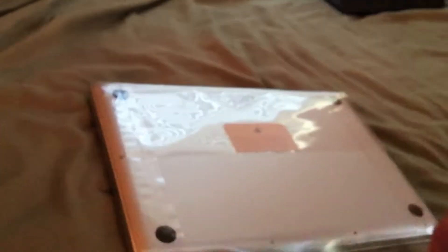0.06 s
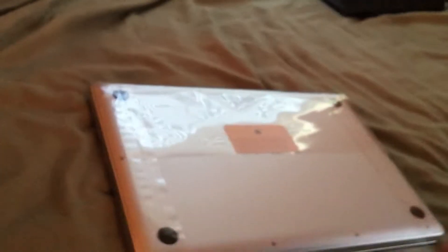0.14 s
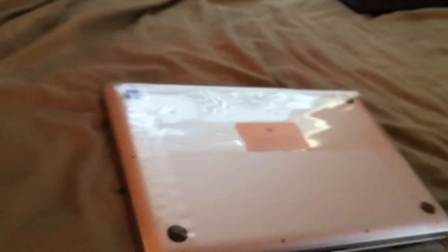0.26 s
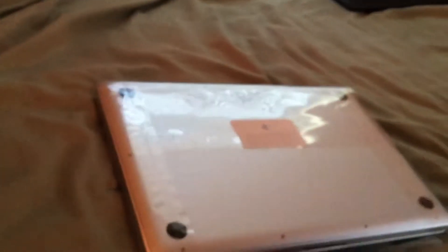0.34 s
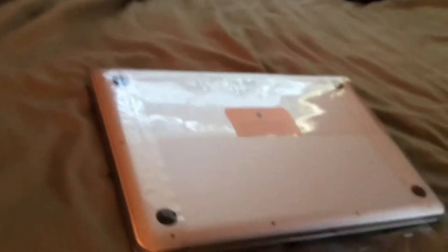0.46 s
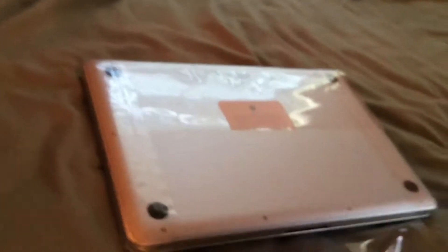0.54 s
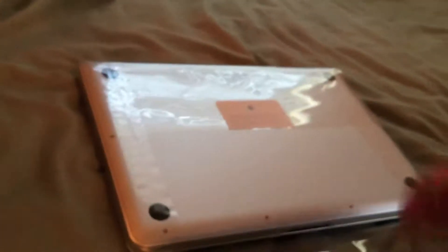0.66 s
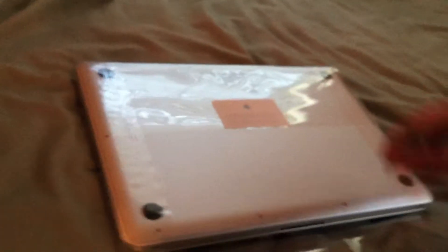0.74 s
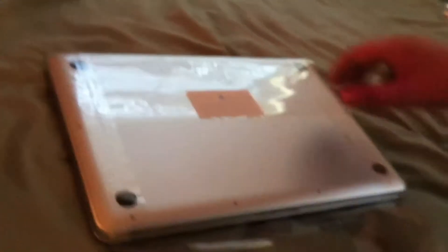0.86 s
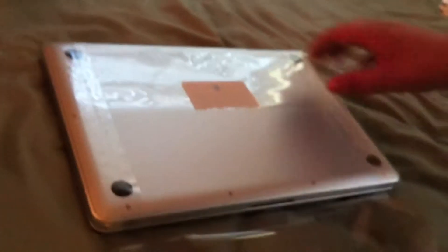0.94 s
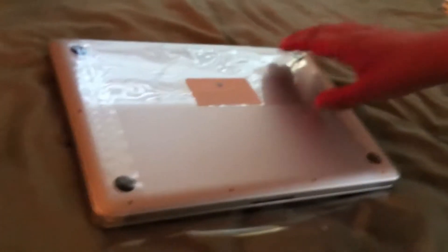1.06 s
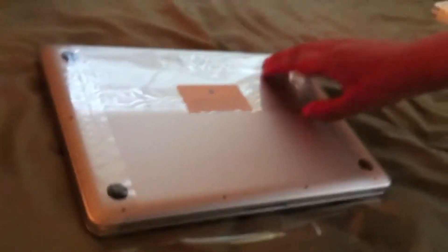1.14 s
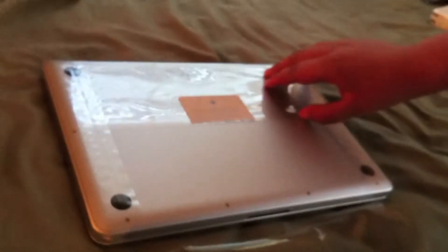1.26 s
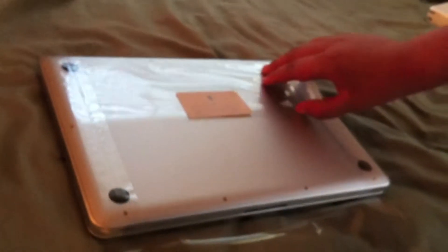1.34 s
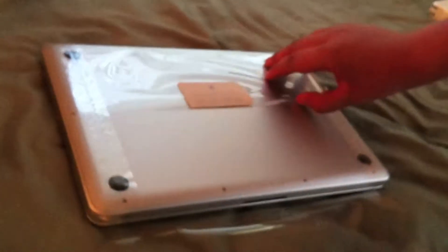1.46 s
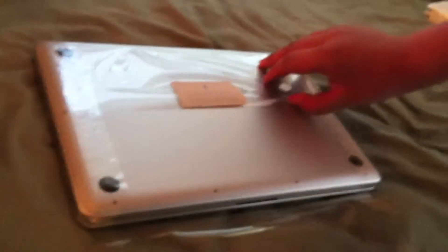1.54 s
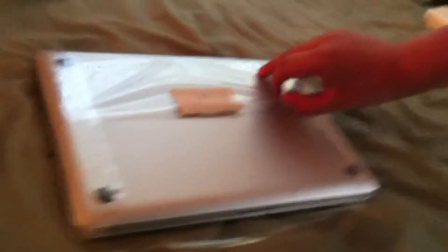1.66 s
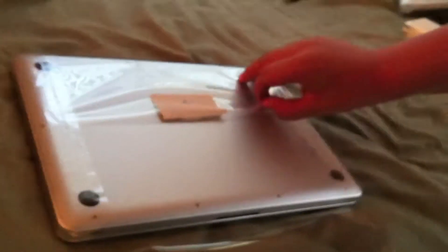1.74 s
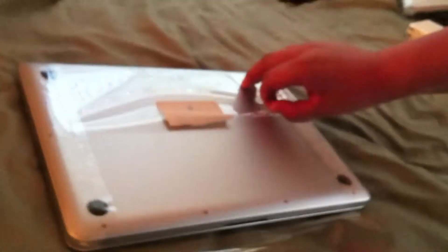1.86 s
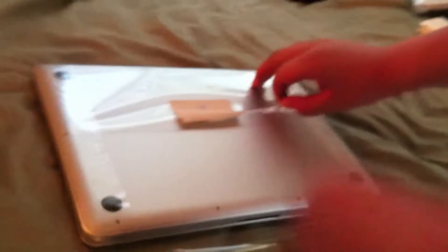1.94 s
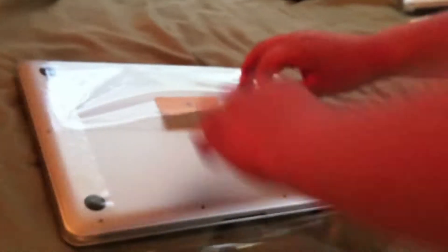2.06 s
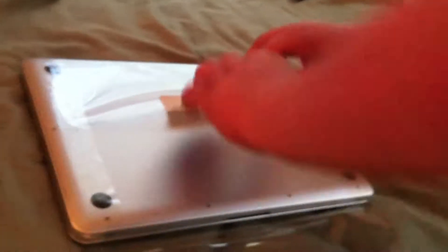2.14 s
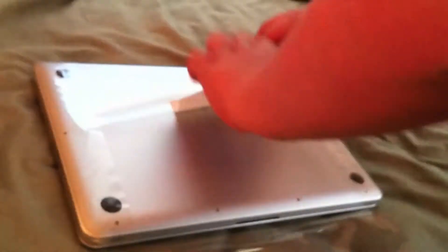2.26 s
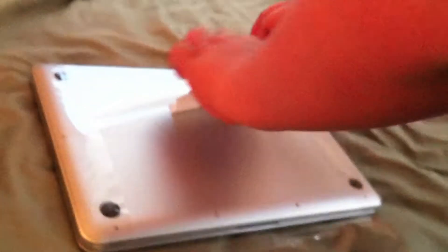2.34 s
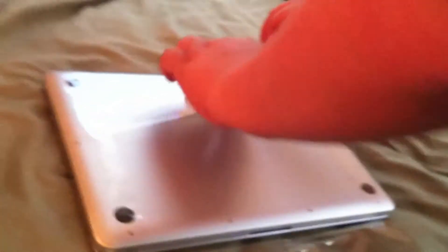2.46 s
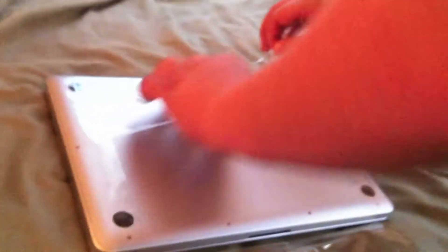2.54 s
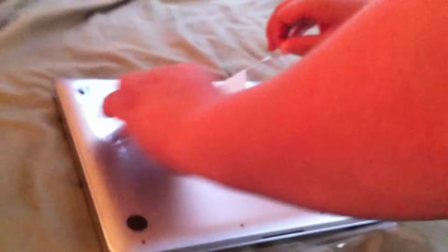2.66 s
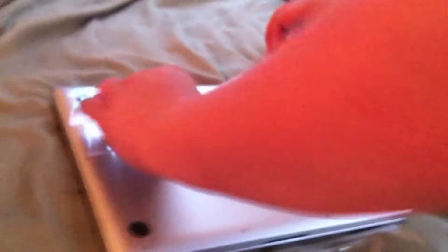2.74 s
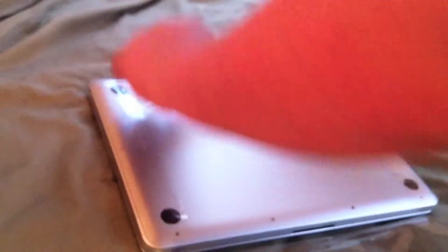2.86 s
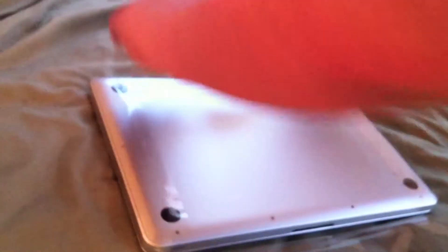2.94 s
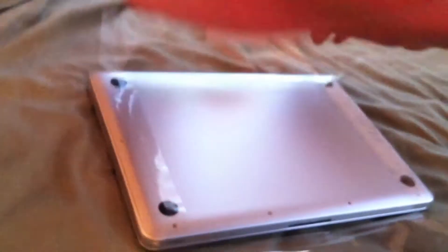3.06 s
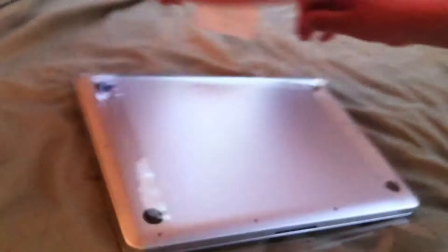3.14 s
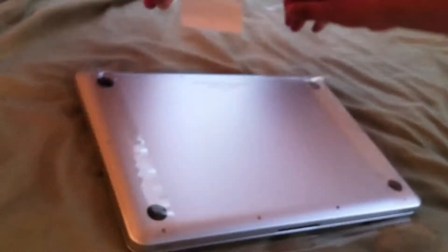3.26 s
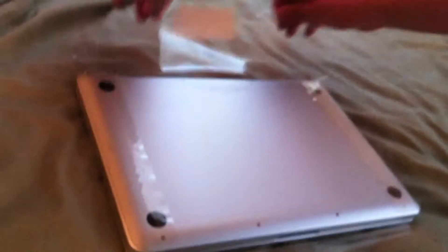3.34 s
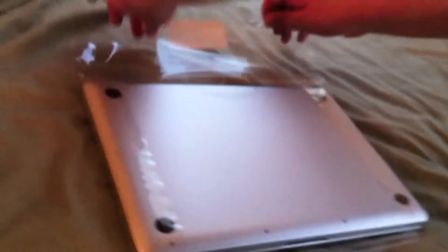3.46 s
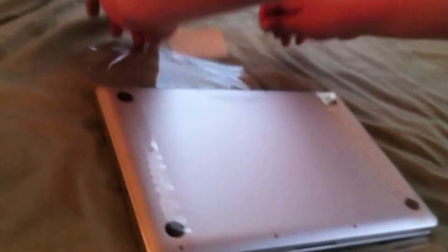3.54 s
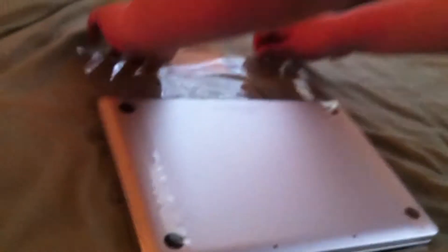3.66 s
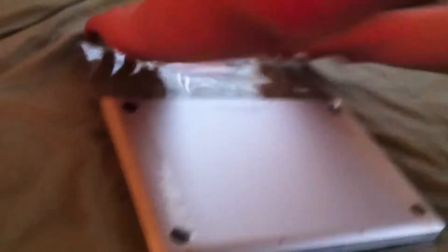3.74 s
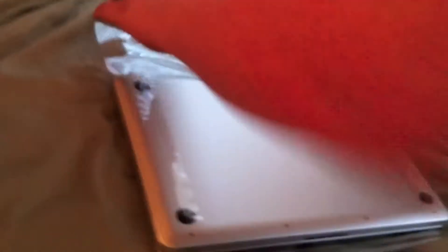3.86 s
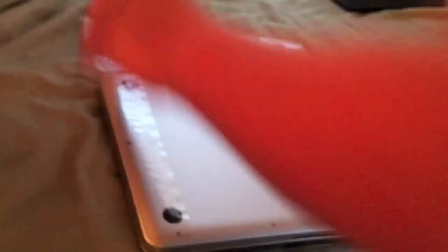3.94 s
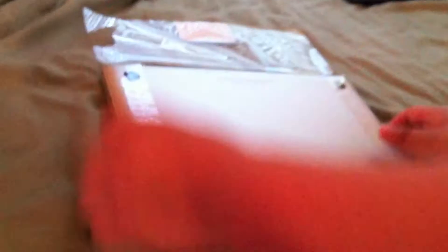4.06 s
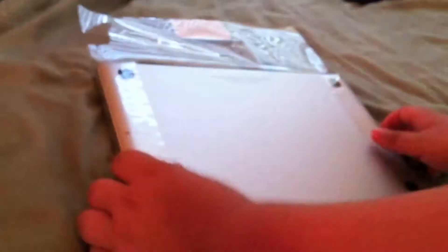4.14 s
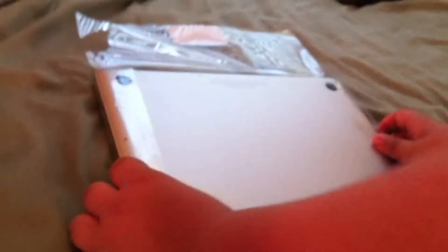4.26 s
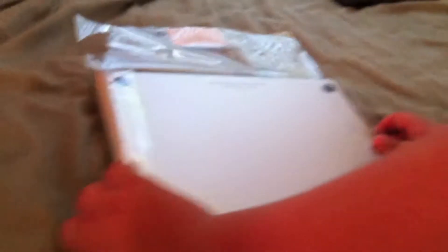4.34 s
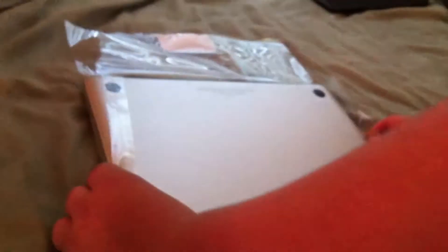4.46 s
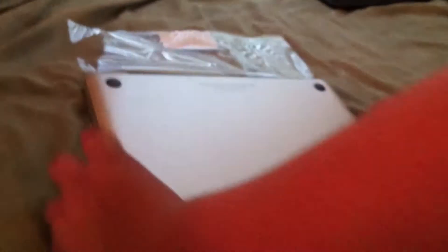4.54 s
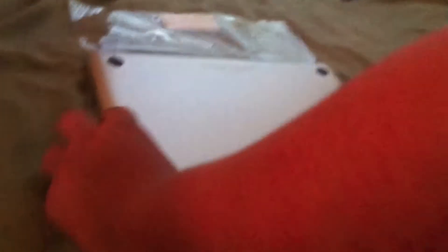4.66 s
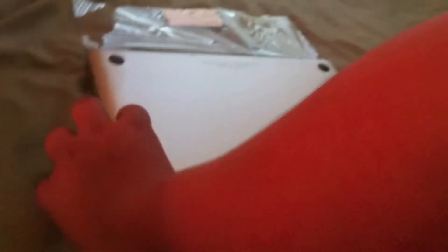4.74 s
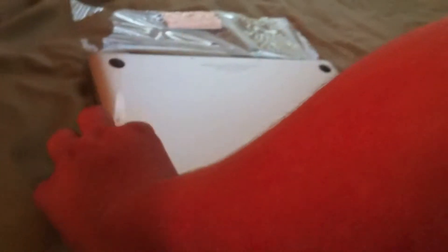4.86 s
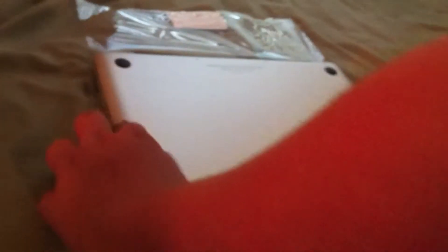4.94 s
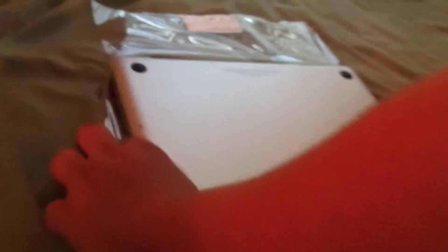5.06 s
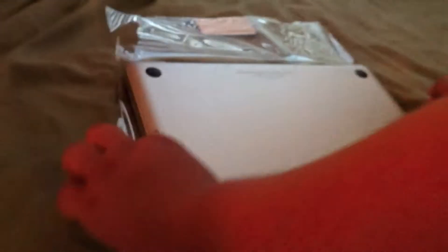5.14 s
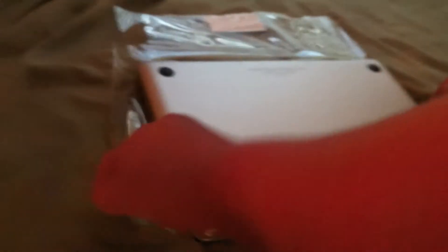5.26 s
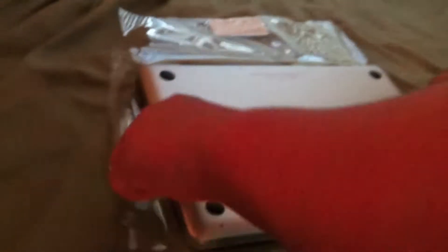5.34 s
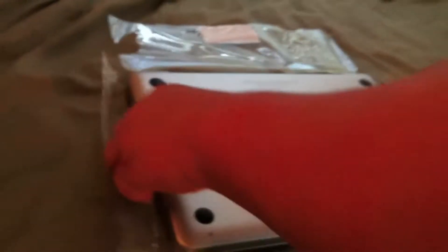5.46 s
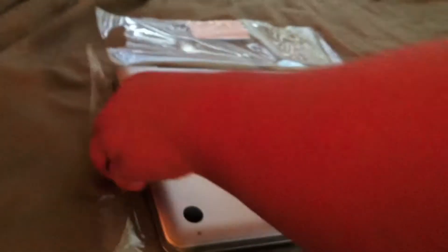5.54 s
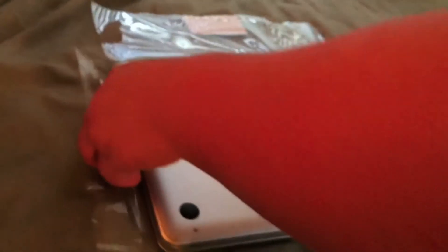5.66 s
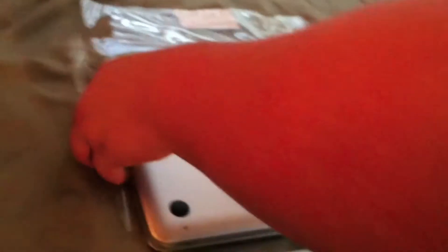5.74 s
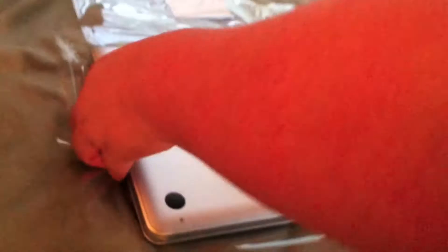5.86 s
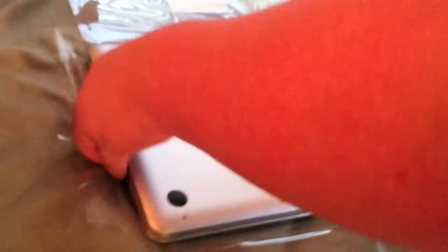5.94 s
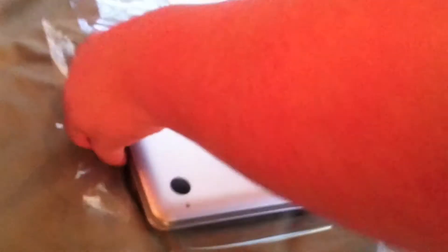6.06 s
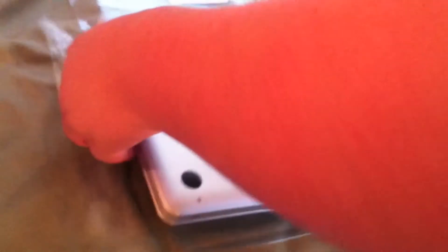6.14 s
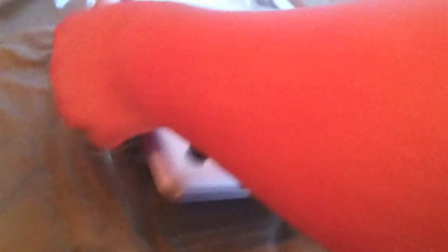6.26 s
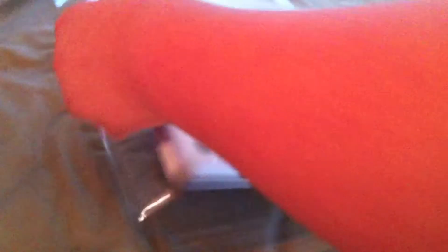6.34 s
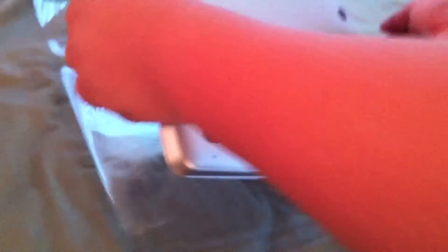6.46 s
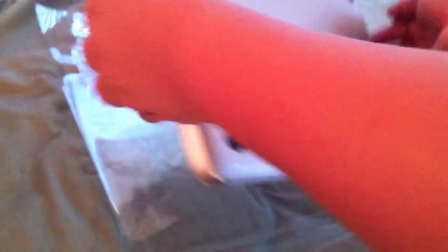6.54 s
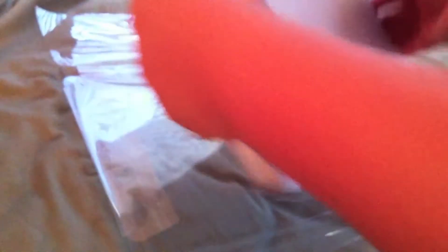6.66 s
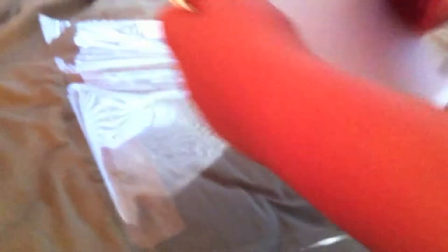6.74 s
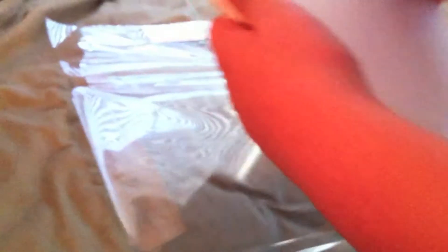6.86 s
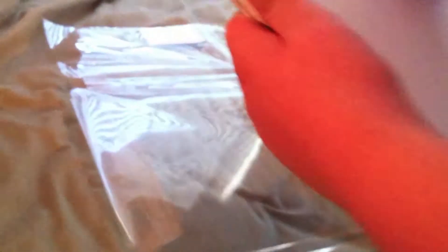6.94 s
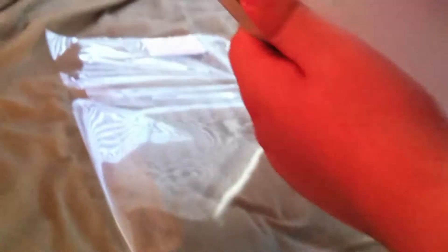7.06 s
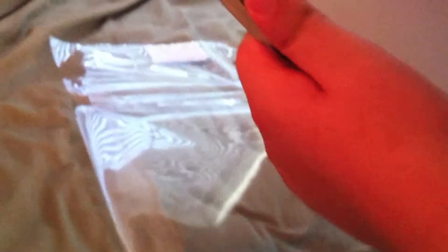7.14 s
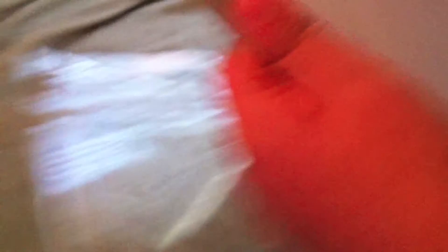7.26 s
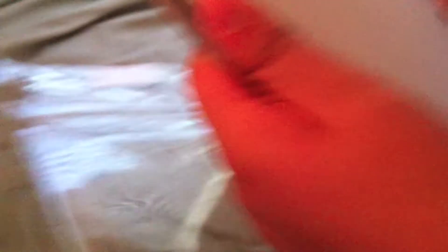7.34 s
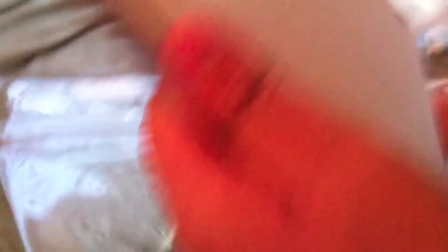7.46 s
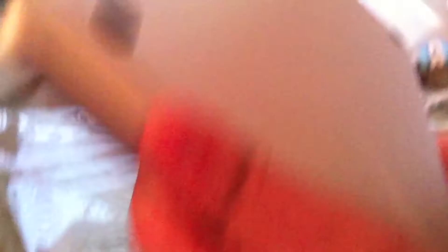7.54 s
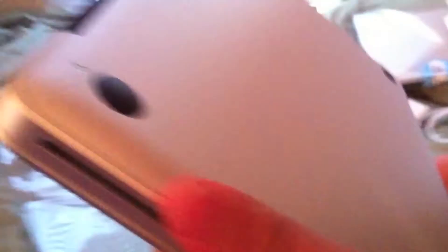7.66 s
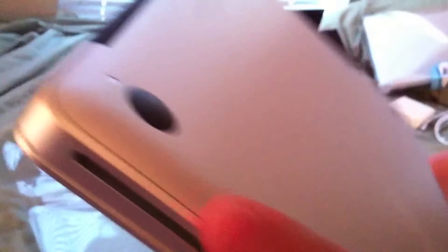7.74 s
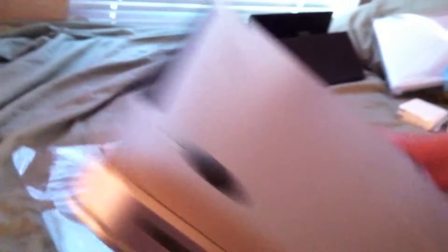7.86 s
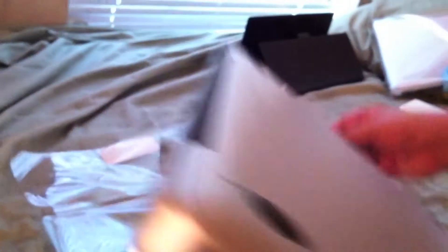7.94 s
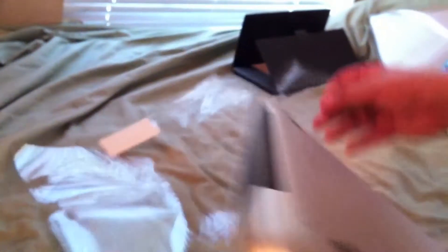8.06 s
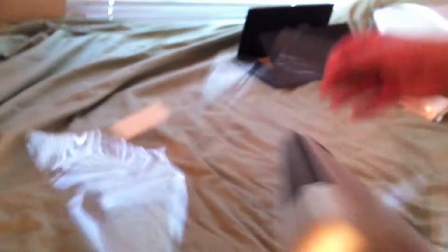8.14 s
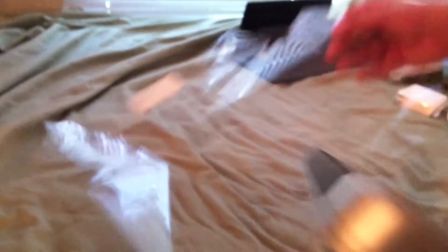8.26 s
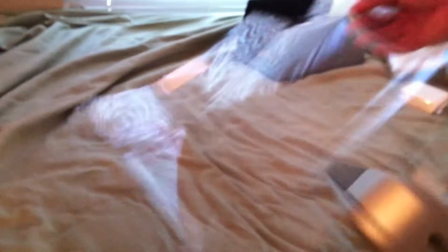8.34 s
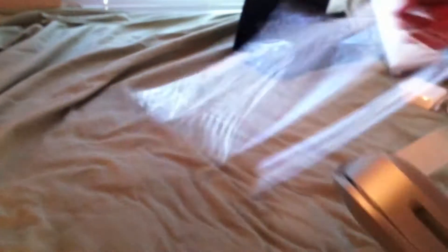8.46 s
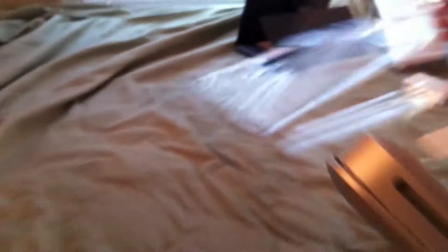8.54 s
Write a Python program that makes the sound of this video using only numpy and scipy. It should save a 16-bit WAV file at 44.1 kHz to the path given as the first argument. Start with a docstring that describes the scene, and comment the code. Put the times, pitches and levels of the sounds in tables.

```python
"""Thin protective film is peeled off a metal laptop on a bed, then the laptop is lifted off the loose sheet.
Close by, the film buckles in sharp snaps: noise bursts and ringing facets, with duller light taps on the
case. Between them it crinkles in random decaying grains, hisses in shaped noise where it comes unstuck, and
squeaks once in a narrow band. Hands and case thud in short low tones and drag in low noise on the bedding.
A small room rings after the snaps, over a low steady rush of noise with a faint hum, as of a distant fan."""
import sys
import numpy as np
from scipy import signal
from scipy.fft import rfft, irfft, next_fast_len
from scipy.io import wavfile
from scipy.ndimage import uniform_filter1d

SR = 44100
rng = np.random.default_rng(int(sys.argv[2]) if len(sys.argv) > 2 else 0)


def wav_record(signal):
    """Record a signal, one row per channel, as 16-bit PCM in the file named by sys.argv[1]."""
    frames = np.transpose(np.atleast_2d(signal))
    bounded = np.clip(frames, -1, 1)
    # unit amplitude maps onto the largest positive 16-bit level
    quanta = np.round(bounded * 32767).astype(np.int16)
    wavfile.write(sys.argv[1], SR, quanta)


N = 379701
TIME = np.arange(N) / SR
CUTOFF_HZ = 16300   # upper edge of the sound
LN_60_DB = np.log(1000)   # decay exponent of a 60 dB fall


def from_db(db):
    """Decibels to gain."""
    return 10 ** (np.asarray(db) / 20)


def rms_one(x):
    """Scale to rms 1."""
    return x / np.sqrt(np.mean(x ** 2) + 1e-20)


def unit_energy(x):
    """Scale each row so that its squares sum to 1."""
    return x / np.sqrt(np.sum(x ** 2, axis=-1, keepdims=True) + 1e-20)


def at_hz(points, hz):
    """Read a table on a log-frequency axis."""
    known_hz, values = np.transpose(points)
    return np.interp(np.log(np.maximum(hz, 1)), np.log(known_hz), values)


def band(x, low_hz, high_hz):
    """Causal band-pass."""
    edges = [low_hz, min(high_hz, SR / 2 - 1000)]
    return signal.sosfilt(signal.butter(2, edges, "band", fs=SR, output="sos"), x + 1e-18)


def coloured_noise(spectrum):
    """Noise of a given spectrum, rms 1."""
    size = next_fast_len(N)
    gain = from_db(at_hz(spectrum, np.fft.rfftfreq(size, 1 / SR)))
    white = rfft(rng.standard_normal(size))
    return rms_one(irfft(white * gain, size)[:N])


def add(track, s, sound):
    """Mix a sound in at a time."""
    start = max(round(s * SR), 0)
    track[start:start + len(sound)] += sound[:max(N - start, 0)]


def swells(rows):
    """Gain of strokes that rise and fade smoothly."""
    gain = np.zeros(N)
    for s, length_s, level_db in rows:
        add(gain, s, from_db(level_db) * np.sqrt(np.hanning(int(length_s * SR))))
    return gain


# steady rush of the room: (frequency [Hz], relative density [dB per Hz])
RUSH_COLOUR = [(30, -33), (75, -23), (100, -10.5), (150, 1.5), (230, 0), (340, 2), (450, -5), (600, -8.5),
               (740, -11.5), (1000, -6.5), (1300, -10.5), (1800, -17.5), (2700, -22), (16000, -26.5)]
# faint wavering hum in the rush, as of a distant fan: (frequency [Hz], width [Hz], rms level [dB])
FAN_HUM = [(232.9, 16, -66.5), (485, 37, -79.5), (612, 30, -81.5), (1118, 43, -80.5), (1273, 34, -79),
           (2560, 25, -89)]


def background(rush_db=-60.5):
    """A low rush of noise; narrow noise bands in it waver like unsteady tones."""
    out = from_db(rush_db) * coloured_noise(RUSH_COLOUR)
    for hz, width_hz, level_db in FAN_HUM:
        tone = band(rng.standard_normal(N), hz - width_hz / 2, hz + width_hz / 2)
        out += from_db(level_db) * rms_one(tone)
    return out


# how long the small room rings: (frequency [Hz], time to fall 60 dB [s])
ROOM_DECAY = [(250, 0.26), (1000, 0.27), (3000, 0.34), (7000, 0.37), (15000, 0.2)]
# tone of the room's tail: (frequency [Hz], relative level [dB])
ROOM_TONE = [(150, 4.5), (400, 6), (1000, 5), (2000, 1), (3800, -4), (7000, 2.5), (10000, -1),
             (14000, -3.5), (16000, -0.5)]


def room(x, build_s=0.0015, early_s=0.031, early_gain=0.93, patchy_db=1.5, count=12):
    """Uneven, stronger early reflections smooth out into a tail that dies band by band."""
    t, tail = TIME[:SR // 2], 0
    patches = rms_one(uniform_filter1d(rng.standard_normal(len(t)), size=40))
    patchiness = from_db(patchy_db * patches * np.exp(-t / 0.024))
    early = 1 + early_gain * np.exp(-t / early_s)
    build_up = 1 - np.exp(-t / build_s)
    edges = np.geomspace(100, 19000, count)
    for low_hz, high_hz in zip(edges, edges[1:]):
        hz = np.sqrt(low_hz * high_hz)
        decay = np.exp(-LN_60_DB * t / at_hz(ROOM_DECAY, hz))
        noise = band(rng.standard_normal(len(t)), low_hz, high_hz)
        tail = tail + from_db(at_hz(ROOM_TONE, hz)) * decay * noise
    response = unit_energy(tail * patchiness * early * build_up)
    return signal.fftconvolve(x, response)[:N]


def near_echo(x, delay_s=0.0036, echo_db=-19.5):
    """One early reflection off a hard surface close by, its path about 1.2 m longer."""
    return from_db(echo_db) * np.pad(x, (int(delay_s * SR), 0))[:N]


# arms and case dragging on the bedding: (start [s], length [s], rms level at the height of the stroke [dB])
BED_DRAGS = [(.33, 0.24, -60.5), (1.84, 0.19, -51), (2.36, 0.091, -53.5), (3.22, 0.13, -53.5),
             (4.07, 0.154, -57), (5.0, 0.15, -62), (5.29, 0.086, -55.5), (6.8, 0.085, -65)]
# tone of the dragging: (frequency [Hz], relative level [dB])
DRAG_TONE = [(30, -36), (65, 2), (100, 8.5), (180, 7), (260, -8.5), (500, -44.5)]


def dragging():
    """Soft bedding rubs as low noise that rises and fades with each stroke."""
    return swells(BED_DRAGS) * coloured_noise(DRAG_TONE)


# soft knocks of hands and case on the bed: (start [s], peak [dB], pitch [Hz])
BED_KNOCKS = [(0.052, -33.5, 150), (0.166, -43, 154), (0.354, -41, 230), (0.684, -45.5, 145),
              (0.841, -46, 171), (1.021, -47, 178), (1.192, -41.5, 248), (1.649, -44, 280),
              (1.882, -37.5, 140), (1.904, -35, 173), (2.367, -37, 190), (3.246, -31, 231),
              (3.719, -48, 206), (4.094, -43, 150), (4.159, -43, 162), (5.325, -41.5, 202),
              (5.826, -43, 228), (5.887, -46.5, 154)]


def thuds(cycles=2.54, rebound_s=0.033, rebound_db=-10.5):
    """The bedding damps each knock to two or three low cycles; the case rocks back once, more weakly."""
    out = np.zeros(N)
    for s, peak_db, hz in BED_KNOCKS:
        length_s = cycles / hz
        t = TIME[:int(length_s * SR)] - length_s / 2
        knock = from_db(peak_db) * np.hanning(len(t)) * np.sin(2 * np.pi * hz * t)
        add(out, s, knock)
        add(out, s + rebound_s, from_db(rebound_db) * knock)
    return out


# film rubbing on the metal: (start [s], length [s], rms level at the height of the stroke [dB])
METAL_RUBS = [(5.5, 0.033, -61.5)]


def squeak(low_hz=3450, high_hz=3900):
    """Stick and slip excite one narrow resonance, here a narrow band of noise."""
    return swells(METAL_RUBS) * rms_one(band(rng.standard_normal(N), low_hz, high_hz))


# film coming unstuck and sliding: (start [s], length [s], rms level at the height of the stroke [dB])
PEEL_STROKES = [(1.25, 0.068, -65), (1.505, 0.077, -52.5), (1.622, 0.036, -53.5), (3.67, 0.067, -55.5)]
# tone of the peel: (frequency [Hz], relative level [dB])
PEEL_TONE = [(1500, -10), (3800, -9.5), (5200, -3), (7000, -3.5), (9000, -9), (13000, -12), (16000, -20)]


def peeling(grain_db=2.5):
    """Countless bonds part along the peel line: a bright, grainy hiss that swells and fades."""
    grain = from_db(grain_db * rms_one(uniform_filter1d(rng.standard_normal(N), size=60)))
    return swells(PEEL_STROKES) * rms_one(coloured_noise(PEEL_TONE) * grain)


# the hands flex the sheet:
# (start [s], length [s], crinkle level before the mix [dB], tautness as treble against midrange [dB])
HAND_FLEXES = [(.01, 0.025, -72.5, 4), (0.234, 0.067, -49, -4), (0.371, 0.046, -47.5, -12),
               (.56, 0.066, -60.5, -3), (2.069, 0.1, -62, 2), (2.214, .2, -56.5, 2),
               (2.555, 0.54, -64.5, 4.5), (3.145, 0.16, -57, -7), (3.37, 0.072, -65, -4),
               (3.572, 0.046, -57, -3.5), (3.776, 0.025, -60.5, -0.5), (3.876, 0.025, -58.5, -11),
               (4.428, 0.34, -64, 1), (4.92, 0.26, -58.5, -4.5), (5.308, 0.044, -54.5, -3),
               (5.502, 0.14, -66.5, -5), (5.724, 0.44, -62, -3), (6.374, 0.04, -64, -2),
               (7.76, 0.058, -62.5, -10), (7.857, .25, -59, -8.5), (8.175, 0.21, -58.5, -15.5),
               (8.45, 0.11, -65, -4.5)]


def flexing(attack_s=0.046, release_s=0.023, resting_db=-82.5):
    """Each flex builds up ahead, holds and dies away; gives crinkle level and tautness, both in dB."""
    effort, taut = np.full(N, from_db(resting_db)), np.zeros(N)
    for s, length_s, level_db, taut_db in HAND_FLEXES:
        attack = np.clip(1 + (TIME - s) / attack_s, 0, 1) ** 2
        release = np.exp(-np.maximum(TIME - s - length_s, 0) / release_s)
        pull = from_db(level_db) * attack * release
        effort += pull
        taut += pull * taut_db
    return 20 * np.log10(effort), taut / effort


def crinkle(level_db, centre_hz, octaves, per_s, cycles, spread_db, count=3):
    """Tiny creases give way at random; each rings a few cycles in facets of its own size."""
    starts, t = np.flatnonzero(rng.random(N) < per_s / SR), TIME[:SR // 120]
    chance = rng.standard_normal((len(starts), 1 + 2 * count, 1))
    size, facets, shares = np.split(chance, [1, 1 + count], axis=1)
    hz = np.broadcast_to(centre_hz, N)[starts, None, None] * 2 ** (octaves * facets)
    turns = np.minimum(hz, CUTOFF_HZ) * t
    # every facet falls 60 dB in the same number of cycles
    ringing = np.sin(2 * np.pi * turns) * np.exp(-LN_60_DB * turns / cycles)
    rings = np.sum(shares * np.sqrt(hz) * ringing, axis=1)
    grains = from_db(spread_db * np.minimum(size[:, 0], 2)) * rings
    places = starts[:, None] + np.arange(len(t))
    out = np.bincount(places.ravel(), grains.ravel(), N)[:N]
    return from_db(level_db) * rms_one(out)


def crackle():
    """Broad folds tumble low, louder on a slack sheet; a tauter sheet rings higher and brighter."""
    flex_db, taut_db = flexing()
    facet_hz = 3270 * 2 ** (0.04 * taut_db)   # octaves per dB of tautness
    fold_db = flex_db - 14 - 0.34 * taut_db
    folds = crinkle(fold_db, 560, octaves=0.49, per_s=200, cycles=3.5, spread_db=4.0)
    coarse = crinkle(flex_db, facet_hz, octaves=0.5, per_s=230, cycles=9.0, spread_db=7.0)
    fine = crinkle(flex_db + taut_db, 8600, octaves=0.51, per_s=520, cycles=6.0, spread_db=3.5)
    # small facets radiate no bass
    facets = band(from_db(-3.5) * coarse, 650, 7150) + from_db(-3.5) * fine
    return band(folds, 200, 2000) + facets


# broad resonances and dips of the sheet against the case: (frequency [Hz], width [Hz], gain [dB])
SHEET_RESONANCES = [(736, 355, -8), (1060, 330, 4), (1750, 550, 1.5), (2513, 160, 0.5), (3900, 270, 0.5)]


def sheet(x):
    """Each resonance lifts or sinks a broad band."""
    for hz, width_hz, db in SHEET_RESONANCES:
        lift, damping = from_db(db / 2), np.pi * width_hz / SR
        turn = -2 * np.cos(2 * np.pi * hz / SR)
        zeros = [1 + damping * lift, turn, 1 - damping * lift]
        poles = [1 + damping / lift, turn, 1 - damping / lift]
        x = signal.lfilter(zeros, poles, x)
    return x


# film creases buckle; the dull ones near 1.1 kHz are light taps on the metal case:
# (time [s], crack level as rms if spread over one millisecond [dB],
# body against the crack [dB], sizzle against the crack [dB], pitch of the ring [Hz])
SNAPS_AND_TAPS = [(0.1098, -38.5, -4.5, 2.5, 1140), (0.208, -34.5, -12, 2, 6100),
                  (0.213, -31, -8.5, -16, 3800), (0.2879, -27, -5.5, 0.5, 6750),
                  (0.357, -39, -2, -18, 2980), (0.366, -36.5, 3, -13, 3360), (0.403, -38.5, -1, -13, 1170),
                  (0.4126, -38, -18, -9, 1095), (0.6063, -39, -9.5, -6, 5930),
                  (0.634, -40, -6.5, 1.5, 10250), (0.6596, -45.5, -15, 3.5, 7000),
                  (1.195, -63.5, 18, -11, 1090), (1.4142, -59, -2, 18, 10200), (1.6579, -20, -12, 7, 9860),
                  (1.6648, -20.5, -37, 5.5, 6490), (1.7737, -39, -8.5, 3, 4870),
                  (2.0876, -44, -30, 5, 11200), (2.224, -32.5, 1, -9, 2330), (2.2342, -26.5, -8, -12, 4800),
                  (2.2776, -28, -17, -3, 2520), (2.2907, -36.5, -4, -4, 2360),
                  (2.333, -35, -5.5, -10, 5720), (2.3665, -30.5, -4, -2.5, 4570),
                  (2.417, -28.5, -10, -2.5, 2680), (2.5712, -42, -4, -9, 2810),
                  (2.5954, -46.5, -18, 4.5, 6060), (2.789, -45, -18, 5, 7150),
                  (2.8328, -19, -18.5, 7, 7170), (2.9155, -28, -9.5, 5, 8730), (2.9977, -49.5, 1, 10, 8930),
                  (3.1182, -30, -5, 6, 5900), (3.1338, -30, -9, 2.5, 5740), (3.1598, -30, -1, 10, 11500),
                  (3.2159, -36.5, 4.5, 10, 12500), (3.2351, -28, -9, 8.5, 8490),
                  (3.2527, -24.5, -0.5, -8, 1270), (3.5322, -23.5, -7, -3.5, 2650),
                  (3.5546, -32, -7, -6.5, 5140), (3.599, -43, 5.5, -7, 910), (3.7736, -47, 2.5, 3, 5590),
                  (4.4853, -35.5, -14, -6.5, 3490), (4.6017, -34.5, -3.5, -7, 3050),
                  (4.6852, -44.5, -1.5, -14, 2550), (4.8436, -49, 6, -21, 1080),
                  (4.9146, -38, -16, -2.5, 3220), (4.967, -48, 8, -12, 890), (5.154, -40, -3, -16, 1310),
                  (5.3295, -41.5, 0, -5, 1140), (5.364, -47, 0, 2.5, 2450), (5.4751, -50.5, 6, -5, 1100),
                  (5.6575, -53, 1, 8.5, 8200), (5.708, -48.5, 6.5, -17, 1230), (5.744, -42, 1.5, -2, 1040),
                  (5.9476, -47, 11, -12, 860), (6.0417, -36.5, -23, 4.5, 5100),
                  (6.1456, -43.5, -2, 1.5, 1060), (6.1697, -43.5, -0.5, 2.5, 5670),
                  (6.209, -28.5, -7, -4.5, 5930), (6.3425, -42, -7, 2, 11400),
                  (6.394, -46.5, 2.5, -7, 1040), (7.819, -42.5, 2.5, -28.5, 3060),
                  (7.872, -49.5, 10.5, -16, 1230), (7.9087, -40, -8, -12, 1900),
                  (7.9456, -36, 1, -15, 1850), (8.053, -36.5, 0.5, -25, 1950), (8.0827, -47, -7, -19, 2800),
                  (8.0924, -35, -14, -12.5, 2820), (8.2658, -53, 0, -24, 2630)]
# how body, crack and sizzle radiate, before the sizzle shifts the band:
# (low edge [Hz], high edge [Hz], flutter's time to fall 60 dB [s], flutter against the first pulse [dB])
RADIATION_BANDS = [(253, 1040, 0.013, 5), (2450, 6640, 0.027, -0.5), (5100, 14050, 0.015, -2)]
# a snap with more sizzle is a smaller crease: rise of (body, crack, sizzle) bands [octaves per dB of sizzle]
BAND_RISE = [0, .026, .008]
# how much of a snap's or tap's (body, crack, sizzle) feeds the room [dB]
ROOM_FEED_DB = [-7, -5, -5]


def snaps(flip_s=0.00054, facet_db=0.0, facet_cycles=32.0, facet_room_db=-10):
    """A flip or tap gives a sub-millisecond pulse, a ring and a flutter; returns direct sound and room feed."""
    direct, feed, t = np.zeros(N), np.zeros(N), TIME[:SR // 25]
    high_edges = np.array(RADIATION_BANDS)[:, 1]
    chance = rng.standard_normal((len(SNAPS_AND_TAPS), len(RADIATION_BANDS), 2, len(t)))
    for (s, crack_db, body_db, sizzle_db, facet_hz), noise in zip(SNAPS_AND_TAPS, chance):
        levels_db = [crack_db + body_db, crack_db, crack_db + sizzle_db]
        gains = from_db(levels_db) * np.sqrt(SR / 1000)   # rms over one millisecond to energy
        facet_decay = np.exp(-LN_60_DB * facet_hz * t / facet_cycles)
        facet = unit_energy(np.sin(2 * np.pi * facet_hz * t) * facet_decay)
        facet_band = np.searchsorted(high_edges, facet_hz)
        for k, (low_hz, high_hz, t60, flutter_db) in enumerate(RADIATION_BANDS):
            rise = 2 ** (BAND_RISE[k] * sizzle_db)
            flip_drive = noise[k, 0] * np.exp(-t / flip_s)
            flutter_drive = noise[k, 1] * np.exp(-LN_60_DB * t / t60)
            drives = np.array([flip_drive, flutter_drive, signal.unit_impulse(len(t))])
            flip, flutter, even = unit_energy(band(drives, rise * low_hz, rise * high_hz))
            ring = from_db(facet_db) * (facet_band == k) * facet
            add(direct, s, gains[k] * unit_energy(flip + from_db(flutter_db) * flutter + ring))
            # the room gathers all directions: ripples in the spectrum even out, the ring's colour stays
            to_room = unit_energy(even + from_db(facet_room_db) * ring)
            add(feed, s, gains[k] * from_db(ROOM_FEED_DB[k]) * to_room)
    return direct, feed


def scene():
    """Film and handling close by in the small room, over the steady rush."""
    rush = background()
    handling = thuds() + dragging()
    hiss = peeling() + squeak()
    crinkling = crackle()
    direct, snap_feed = snaps()
    room_feed = snap_feed + from_db(-3.5) * crinkling + from_db(-10.5) * hiss + from_db(-18.0) * handling
    film = sheet(direct + near_echo(direct) + crinkling + room(room_feed))
    return (film + hiss + handling + rush)[None]


def record(dry):
    """Nothing is heard above about 16 kHz; the top ends steeply."""
    return signal.sosfilt(signal.cheby1(12, 0.2, CUTOFF_HZ, fs=SR, output="sos"), dry)


dry = scene()
out = record(dry)
wav_record(out)
```